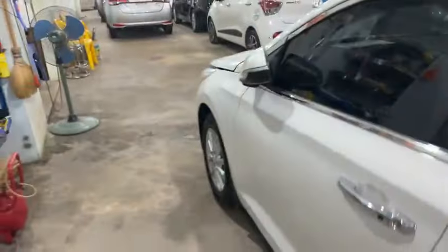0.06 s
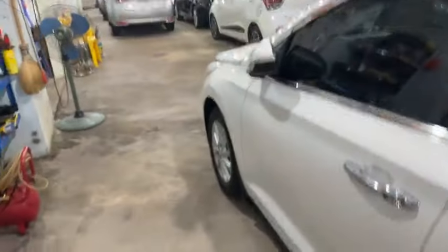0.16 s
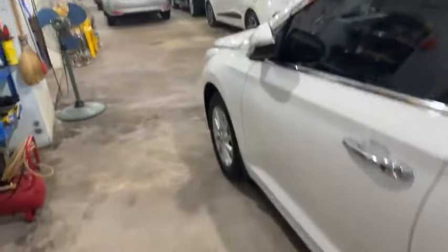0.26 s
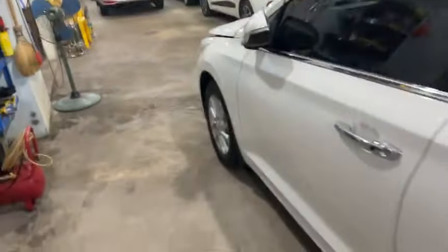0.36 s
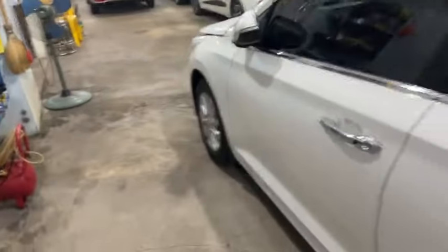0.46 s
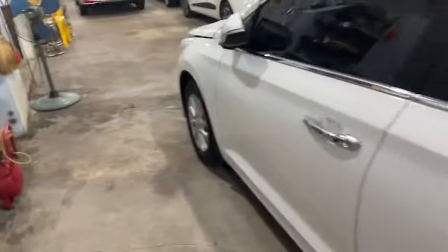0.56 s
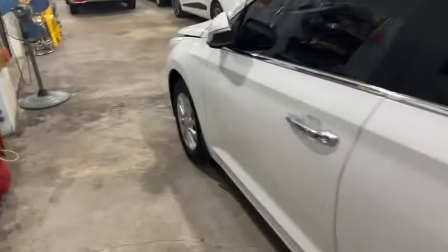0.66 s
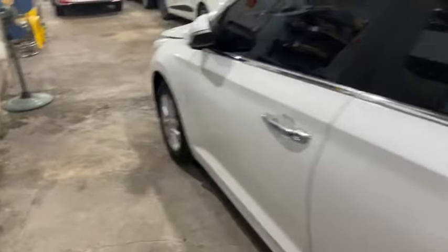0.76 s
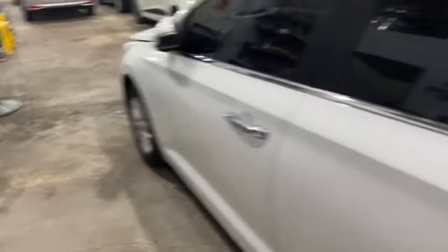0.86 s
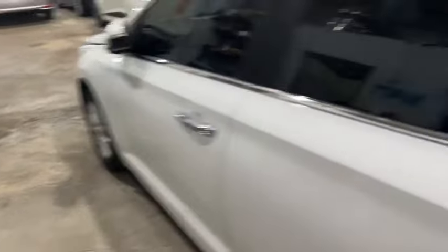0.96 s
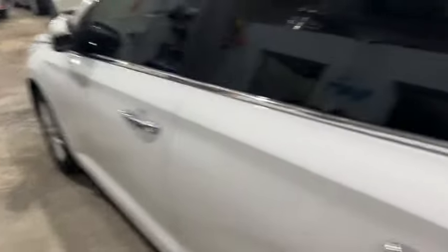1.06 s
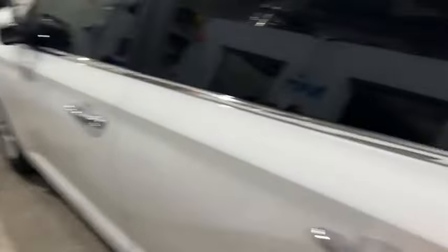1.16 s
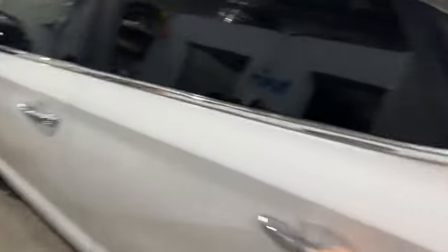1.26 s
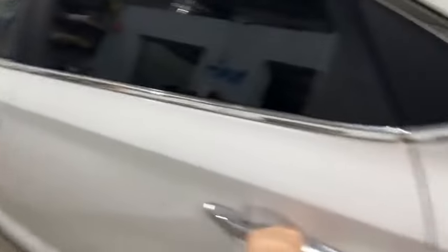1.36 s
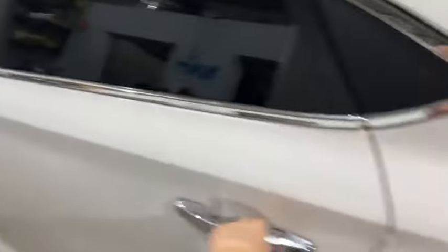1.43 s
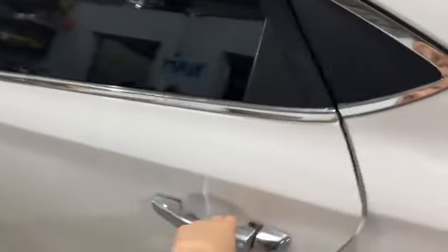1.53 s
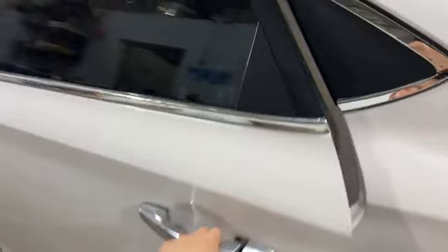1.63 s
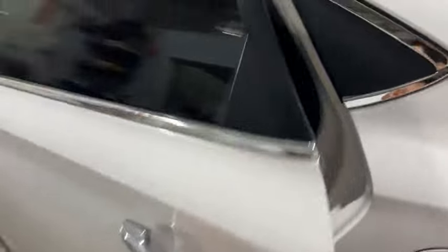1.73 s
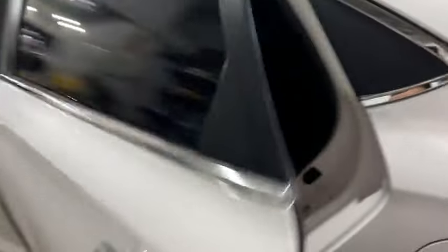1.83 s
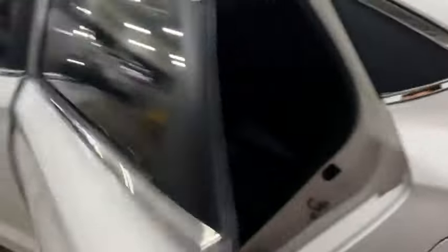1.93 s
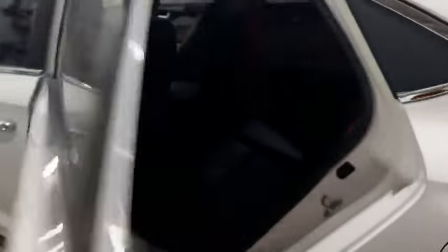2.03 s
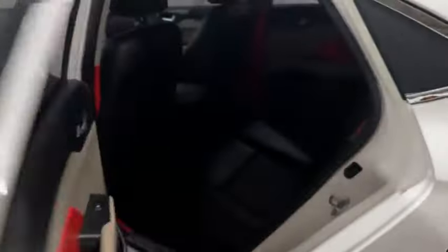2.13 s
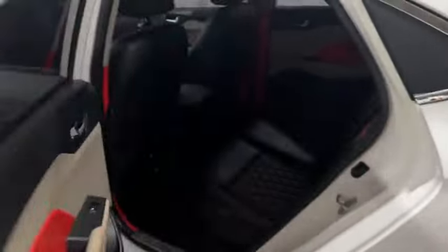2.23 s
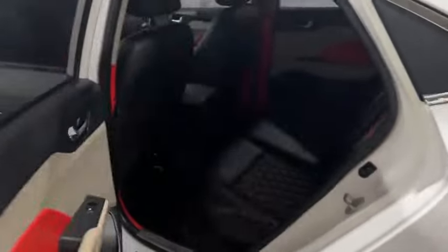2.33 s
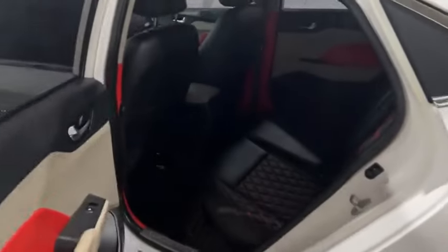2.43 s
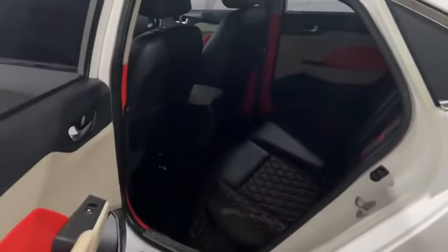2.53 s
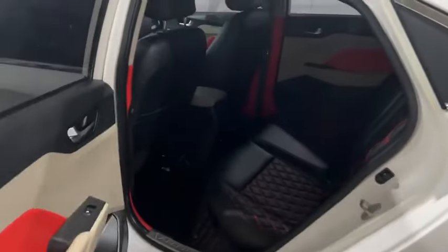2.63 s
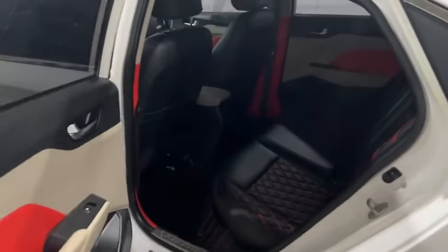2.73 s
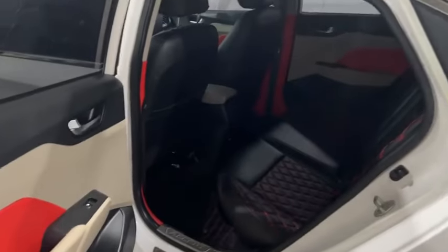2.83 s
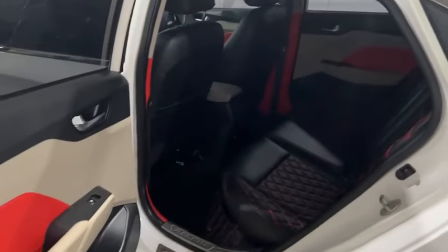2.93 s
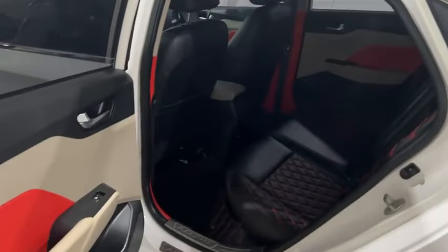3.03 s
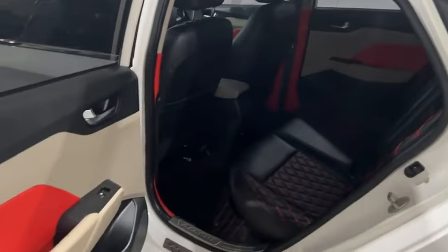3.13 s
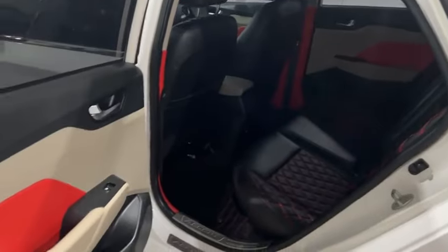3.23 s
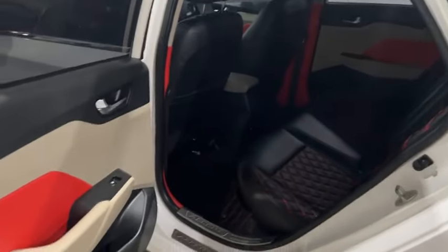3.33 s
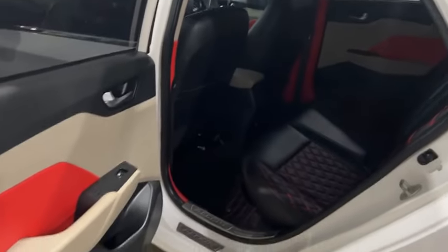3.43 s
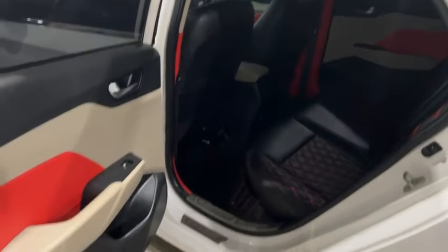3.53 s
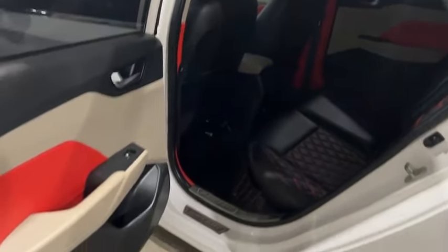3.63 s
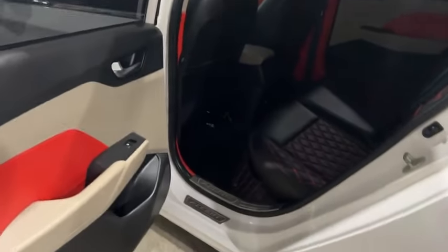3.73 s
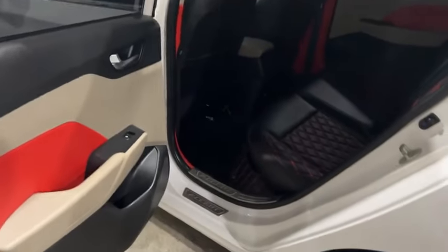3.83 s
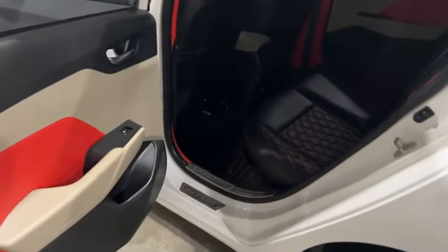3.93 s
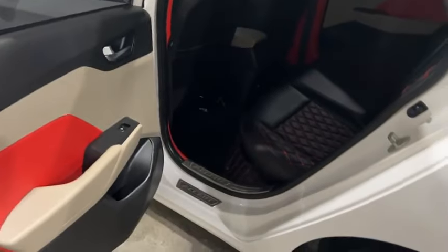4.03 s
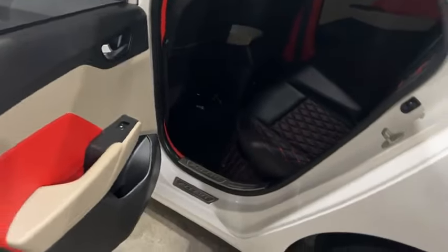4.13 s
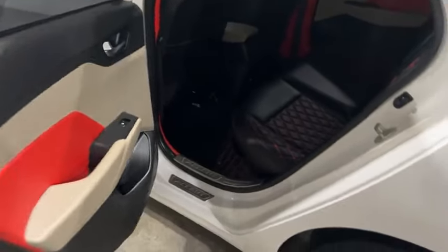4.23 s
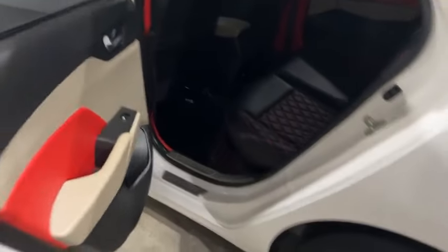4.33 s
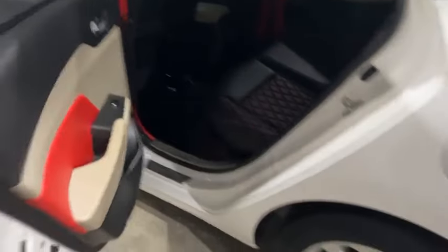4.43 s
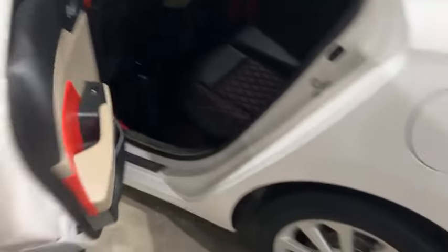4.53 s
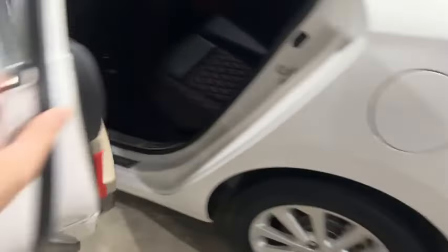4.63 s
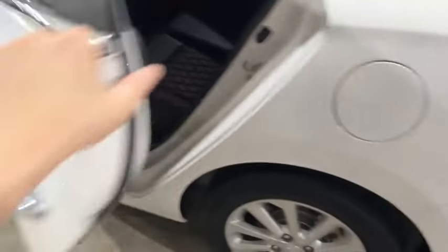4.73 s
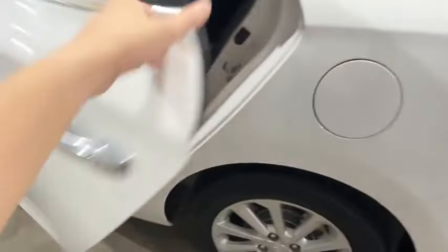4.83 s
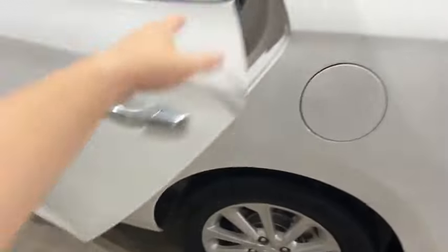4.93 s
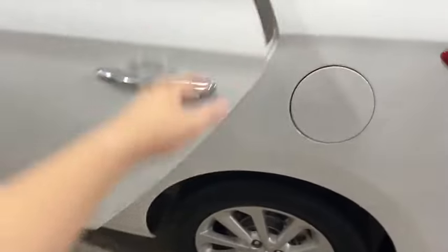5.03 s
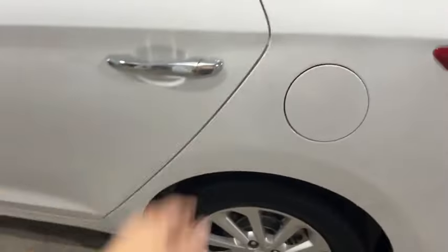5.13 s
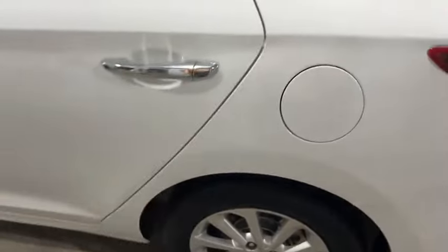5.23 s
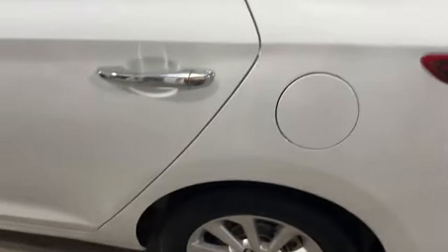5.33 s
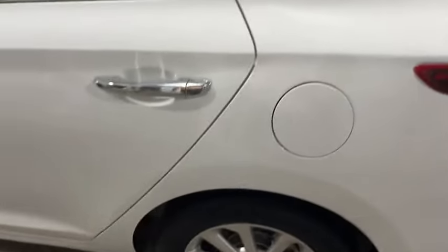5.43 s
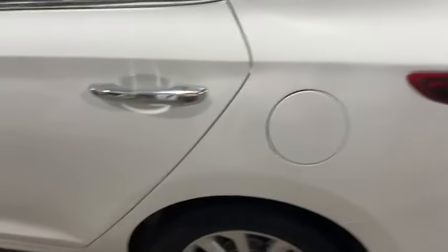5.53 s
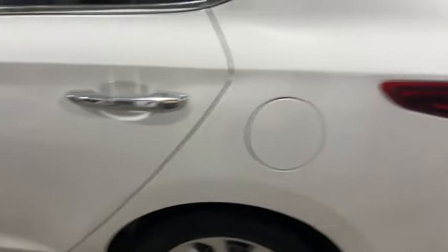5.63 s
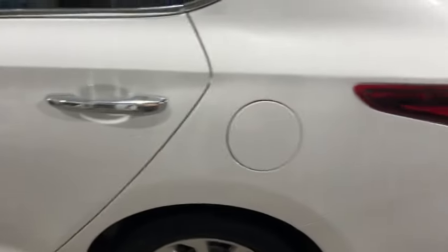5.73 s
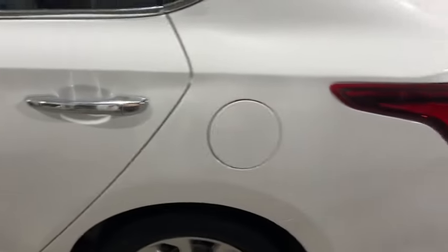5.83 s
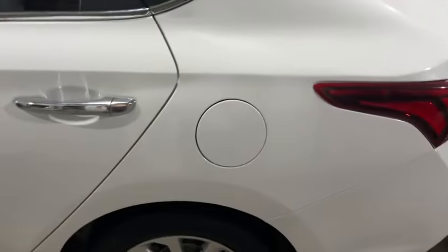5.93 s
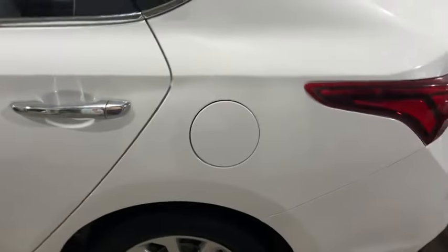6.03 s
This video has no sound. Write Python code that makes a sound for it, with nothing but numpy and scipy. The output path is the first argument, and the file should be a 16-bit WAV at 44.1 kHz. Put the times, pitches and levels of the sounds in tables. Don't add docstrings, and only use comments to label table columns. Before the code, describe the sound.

A single handheld microphone beside a car catches a booming door slam, shoe scuffs and a far low engine, small metal latch clacks, a dry handle knock and a short gritty rub. After dull cabin bumps and a short groan, a second, louder and tighter slam cracks off the hard walls, its echo dying quickly into steady high insect noise, faint fan hum and street rumble.

```python
import sys
import numpy as np
from scipy import signal
from scipy.fft import rfft, irfft
from scipy.io import wavfile
from scipy.ndimage import uniform_filter1d

SR = 44100
rng = np.random.default_rng(int(sys.argv[2]) if len(sys.argv) > 2 else 0)


def output_pcm(signal):
    pcm = np.clip(np.atleast_2d(signal).T, -1, 1) * 32767
    wavfile.write(sys.argv[1], SR, np.round(pcm).astype(np.int16))


def voltage_ratio(decibels):
    exponent = np.asarray(decibels, float) / 20
    return 10 ** exponent


N = 267687
T = np.arange(N) / SR

# (f/Hz, density/dB)
LATCH_CRACK = [(260, 3), (420, -7), (520, -17), (750, -5), (1050, -12), (1400, -14), (1750, -17),
               (2700, -28), (7000, -30), (15500, -52)]
# (f/Hz, density/dB)
HANDLE_CRACK = [(260, -18), (500, -26), (760, -12), (1170, -4), (2490, -21), (3500, -18), (4200, -23),
                (5100, -14), (6200, -15), (9520, -29), (15800, -62)]
# (f/Hz, spread/Hz, level/dB, throbs/Hz, throb depth/dB)
INSECTS = [
    (4905, 403, -1.95, 8.6, 1.5),
    (7405, 356, -1.5, 13, 1.9),
    (9270, 460, -23, 10.5, -1),
]


def evened(x):
    return x / np.sqrt(np.mean(x ** 2) + 1e-20)


def read(points, hz):
    f, value = np.transpose(points)
    return np.interp(np.log(hz + 1), np.log(f + 1), value)


def coloured(points, size):
    gain = voltage_ratio(read(points, np.fft.rfftfreq(size, 1 / SR)))
    return evened(irfft(rfft(rng.standard_normal(size)) * gain, size))


def resonate(x, hz, width):
    turn = np.exp(2j * np.pi * hz * T)
    r = np.exp(-np.pi * width / SR)
    return 2 * (turn * signal.lfilter([1 - r], [1, -r], x / turn)).real


def drift(top_hz):
    coarse = T[::64]
    waves = np.zeros(len(coarse))
    for f in np.geomspace(top_hz / 20, top_hz, 24):
        waves += np.sin(2 * np.pi * (f * coarse + rng.random())) / np.sqrt(f)
    return np.interp(T, coarse, evened(waves))


def swell(peak_s, level_db, rise_s, fall_s, t=T):
    away = np.where(t < peak_s, (peak_s - t) / rise_s, (t - peak_s) / fall_s)
    return voltage_ratio(level_db - np.minimum(20 * away ** 2, 100))


def walls(x):
    # (f/Hz, t60/s)
    wall_t60 = [(100, 0.66), (260, 0.44), (700, 0.38), (1840, 0.34), (4850, 0.5)]
    hz, t, z = signal.stft(rng.standard_normal(SR), SR, nperseg=512)
    t60 = np.clip(read(wall_t60, hz), .1, 2)[:, None]
    tail = signal.istft(z * voltage_ratio(-60 * t / t60), SR, nperseg=512)[1]
    tail = tail * np.clip(np.arange(len(tail)) / SR / 0.02, 0, 1) ** 2
    return signal.fftconvolve(x, tail / np.linalg.norm(tail))[:N]


def blow(strikes, modes, colour, crack_t60, treble_t60, wet_db):
    t, out = T[:SR // 2], np.zeros(N + SR)
    hz, level_db, t60 = np.transpose(modes)[:, :, None]
    for s, strength_db, contact_ms, crack_db in strikes:
        contact = contact_ms / 1000 + 2 / SR
        grip = rng.uniform(-1.55, 1, (2, len(modes), 1))
        turns = hz * (1 + .008 * grip[1]) * t
        decay = voltage_ratio(level_db + 2.6 * grip[0] - 60 * t / t60)
        ring = (decay * np.sin(2 * np.pi * turns)).sum(0)
        push = np.sin(np.pi * np.clip((t[:800] + 1 / SR) / contact, 0, 1)) ** 2
        ring = signal.oaconvolve(ring, push / push.sum())[:len(t)]
        shove = np.sin(2 * np.pi * np.clip(t / (1.89 * contact), 0, 1)) * np.exp(-t / contact)
        noise = coloured(colour, len(t))
        low = signal.sosfilt(signal.butter(2, 1800., fs=SR, output="sos"), noise)
        treble = (noise - low) * voltage_ratio(-60 * t / treble_t60) * 0.00065 / contact
        crack = low * voltage_ratio(-60 * t / crack_t60) + treble
        crack = voltage_ratio(crack_db) * crack * np.minimum(t / (1.09 * contact), 1)
        hit = ring / abs(ring).max() + 1.13 * shove + crack
        out[round(s * SR):][:len(t)] += voltage_ratio(strength_db) * hit
    return out[:N] + voltage_ratio(wet_db) * walls(out[:N])


def traffic():
    # (t/s, level/dB)
    passing = [
        (0.0, -54.5),
        (1.5, -56.5),
        (2.2, -57),
        (3.1, -62),
        (4.2, -63.5),
        (5.2, -62.5),
        (6.07, -61.5),
    ]
    # (peak t/s, level/dB, rise/s, fall/s)
    rolls = [
        (1.62, -53.5, 0.14, 0.23),
        (5.43, -50, 0.17, 0.2),
    ]
    # (f/Hz, density/dB)
    roar = [(15, -60), (35, -16.5), (55, -28), (105, -23), (126, -33.5), (253, -23.5), (445, -32),
            (1050, -35.5), (2000, -43.5), (3340, -49.5), (5500, -50.5), (8000, -61), (11000, -73),
            (15500, -86)]
    quiet_db, dull_per_db = -63, 0.29
    frames, hz = N // 256 + 5, np.fft.rfftfreq(1024, 1 / SR)
    a, b, patches = rng.standard_normal((frames, 513, 3)).T
    patches = evened(uniform_filter1d(uniform_filter1d(patches, size=8, axis=0), size=14, axis=1))
    t = np.arange(frames) * 256 / SR
    power = voltage_ratio(2 * np.interp(t, *np.transpose(passing))) + sum(swell(*row, t) ** 2 for row in rolls)
    level_db = 10 * np.log10(power)
    treble_db = 0.4 - dull_per_db * np.clip(level_db - quiet_db, 0, 9.)
    share = np.clip(np.log2(hz / 500 + 1e-9) / 3.5, -.6, 1)[:, None]
    field_db = read(roar, hz)[:, None] + 1.91 * patches + level_db + share * treble_db
    return voltage_ratio(23.0) * signal.istft((a + 1j * b) * voltage_ratio(field_db), nperseg=1024, noverlap=768)[1][:N]


def fan():
    # (f/Hz, width/Hz, level/dB)
    lines = [(86.1, 5.2, -65), (104.5, 18, -68), (171.2, 9.9, -66), (253.6, 5, -66)]
    noise = rng.standard_normal(N)
    out = np.zeros(N)
    for hz, width, level_db in lines:
        out += voltage_ratio(level_db) * evened(resonate(resonate(noise, hz, width), hz, width))
    return out


def insects():
    # (t/s, depth/dB, span/s)
    ducks = [
        (0.18, 5, 0.26),
        (3.1, -0.5, 0.42),
        (5.3, 0.5, 0.33),
    ]
    out, bins = np.zeros(N), np.fft.rfftfreq(N, 1 / SR)
    for hz, spread, level_db, throbs, depth_db in INSECTS:
        away = abs(bins - hz) / spread
        band = irfft(rfft(rng.standard_normal(N)) * np.exp(-.62 * away ** 2), N)
        throb = np.sin(2 * np.pi * (throbs * T + 0.3 * drift(2.1)))
        out += evened(band) * voltage_ratio(level_db + depth_db * throb + 1.1 * drift(2.1))
    dip_db = sum(depth_db * np.exp(-((T - s) / span) ** 2) for s, depth_db, span in ducks)
    return out * voltage_ratio(-63 - dip_db)


def engine():
    # (peak t/s, level/dB, rise/s, fall/s)
    surges = [
        (0.29, -47, .05, 0.065),
        (0.51, -52, .12, .09),
        (0.68, -46, .12, 0.75),
        (1.04, -45.5, 0.87, 0.12),
        (1.5, -53.5, 0.15, .4),
        (1.74, -52, .12, 0.38),
        (2.2, -64, 0.41, 0.22),
    ]
    coarse = T[::64]
    level = np.interp(T, coarse, np.max([swell(*row, coarse) for row in surges], axis=0))
    hz = 59.5 - 1.37 * level / level.max()
    return np.sqrt(2) * np.sin(2 * np.pi * np.cumsum(hz) / SR) * level


def scuffs():
    # (peak t/s, level/dB, rise/s, fall/s)
    brushes = [(0.2, -60.5, 0.17, 0.27), (0.94, -59, 0.079, 0.14), (1.02, -59.5, 0.17, 0.11),
               (1.36, -93, .08, .3), (1.63, -84, .08, .05), (2.137, -42, 0.014, 0.047),
               (2.21, -58, .1, 0.19), (2.35, -59, .2, .12), (3.0, -68, .1, .1), (4.4, -95, .06, .08)]
    # (f/Hz, density/dB)
    sole = [(800, -23), (1700, 7), (2400, -1), (6000, 0.5), (9000, -13), (12500, -8.5), (15000, -19)]
    coarse = T[::64]
    level = np.interp(T, coarse, sum(swell(*row, coarse) for row in brushes))
    return voltage_ratio(-5.5) * uniform_filter1d(level, size=900) * coloured(sole, N) * voltage_ratio(1.2 * drift(90.0))


def front_slam():
    # (t/s, strength/dB, contact/ms, crack against ring/dB)
    strikes = [
        (.033, -42, 2.1, 17.5),
        (.0495, -15.5, 0.91, -3),
        (.052, -12.5, 1.32, -11.5),
        (.060, -18, 2.1, -18),
        (.066, -14, 0.7, -14.5),
        (.083, -22.5, 1.14, -2),
        (.090, -15.5, 2.4, -16.5),
        (.116, -19.5, 1.9, -10),
        (.127, -20.5, 1.4, -21),
    ]
    # (f/Hz, level/dB, t60/s)
    modes = [(57.6, -1.5, 0.28), (99, 1, 0.13), (137, -8, 0.31), (189.5, -3, 0.13), (264, 3, 0.11),
             (327, 2, 0.1), (405, 3.5, 0.14), (520, -12, 0.14), (575, -8, 0.086), (756, -10, 0.1),
             (905, -24, .1), (1140, -21, .08), (1453, -26, .12)]
    # (f/Hz, density/dB)
    colour = [(260, -3.5), (450, -10), (767, -7), (1520, -25.5), (1710, -17), (2740, -19.5), (2950, -17),
              (4340, -22), (6190, -29.5), (15500, -67)]
    return blow(strikes, modes, colour, 0.12, 0.11, -7.5)


def latch():
    # (t/s, strength/dB, contact/ms, crack against ring/dB)
    strikes = [
        (1.588, -38, 1.6, -1),
        (1.608, -48, 1.5, -4),
        (1.661, -37.5, 1.5, 12),
        (1.665, -20, 0.71, -10),
        (1.674, -29.5, 0.75, 0.5),
        (1.693, -27, 0.72, -2.5),
        (1.715, -32.5, 1.2, -3),
    ]
    # (f/Hz, level/dB, t60/s)
    modes = [(85, -21, .2), (141.7, 2.5, 0.22), (260, -4.5, 0.104), (394, 1.5, 0.097), (670, -12, 0.089),
             (820, -20, .05), (1240, -29, 0.064), (1380, 4, 0.064)]
    return blow(strikes, modes, LATCH_CRACK, 0.068, 0.095, -12.5)


def handle():
    # (t/s, strength/dB, contact/ms, crack against ring/dB)
    strikes = [
        (2.1335, -33, 0.28, 5),
        (2.1355, -25.5, 0.2, -4.5),
        (2.140, -18, 1, -6),
        (2.158, -32.5, 3.6, 4),
        (2.185, -39.5, 0.87, 1.5),
    ]
    # (f/Hz, level/dB, t60/s)
    modes = [(88, -23, 0.16), (154, -9.5, 0.23), (264, -29, 0.043), (383, 9, 0.039), (320, -15, 0.072),
             (792, 0, 0.062), (1110, -2, 0.046), (560, -1, 0.042), (1190, -4, .04), (1450, -23, .04),
             (5690, -20, .1), (6220, -20, .1)]
    return blow(strikes, modes, HANDLE_CRACK, 0.033, 0.013, -10.0)


def check_arm():
    # (peak t/s, level/dB, rise/s, fall/s)
    stroke = (2.41, -58.5, .26, .07)
    rub = evened(resonate(resonate(rng.standard_normal(N), 1550.0, 330.), 1640.0, 330.))
    return rub * swell(*stroke) * voltage_ratio(1.9 * drift(50.))


def bumps():
    # (t/s, strength/dB, contact/ms, crack against ring/dB)
    strikes = [
        (2.458, -57, 4.5, -30),
        (2.609, -38.5, 5.7, -23),
        (2.807, -55, 3.1, -23),
        (4.059, -44, 3.8, -29),
        (4.628, -46.5, 4.5, -27),
        (5.619, -37, 3.1, -25),
    ]
    # (f/Hz, level/dB, t60/s)
    modes = [(71, 4, 0.096), (120, -3, 0.09), (259, -30, .08)]
    return blow(strikes, modes, LATCH_CRACK, 0.027, .03, -9.0)


def seal():
    # (t/s, strength/dB, contact/ms, crack against ring/dB)
    strikes = [
        (5.214, -42, 1.6, -18),
        (4.925, -56, .5, -3),
        (4.385, -66, .2, 3),
    ]
    # (f/Hz, level/dB, t60/s)
    modes = [(300, -9, .08), (450, -.5, .1), (820, -14, .06), (1550, -9, .06)]
    return blow(strikes, modes, HANDLE_CRACK, 0.038, .02, -6.)


def hinge():
    # (peak t/s, level/dB, rise/s, fall/s)
    slip = (4.915, -56, .085, .17)
    start_s, start_hz, glide_hz_per_s = 4.83, 222., 470.
    hz = start_hz + glide_hz_per_s * np.clip(T - start_s, 0, 0.21)
    turns = np.cumsum(hz * (1 + 0.008 * drift(44.0))) / SR
    overtones_db = [-7, -1, -14, -29, -32]
    tone = sum(voltage_ratio(db) * np.sin(2 * np.pi * k * turns) for k, db in enumerate(overtones_db, 1))
    tone *= swell(*slip) * voltage_ratio(1.5 * drift(35.))
    skin = resonate(resonate(tone, 300., 40.), 300., 40.)
    return 0.7 * tone + 9. * skin


def rear_slam():
    # (t/s, strength/dB, contact/ms, crack against ring/dB)
    strikes = [
        (5.276, -28, 1.6, -3),
        (5.2855, -14.5, 1.3, 0),
        (5.289, -16.5, 3.2, 6),
        (5.2938, -5, 2.2, -11),
        (5.31, -23, 0.86, 3),
        (5.317, -12.5, 1.44, -6),
        (5.323, -25, 2.2, 5),
        (5.33, -25.5, 1.55, 4),
        (5.344, -30, 1.3, -2),
        (5.367, -45, 4.6, -21),
    ]
    # (f/Hz, level/dB, t60/s)
    modes = [(62.6, -4, 0.31), (104, -5, 0.094), (141, -3, 0.15), (194, 0.5, 0.077), (282, 1.5, .06),
             (333, 0, 0.056), (393, -0.5, 0.1), (508, -30, .12), (596, 0, .07), (790, -19, .1),
             (830, -20, 0.083), (920, -11, 0.099), (1090, -5, .12), (1315, -26, .12), (2780, -28, .2)]
    # (f/Hz, density/dB)
    colour = [(260, -4), (420, -3.5), (600, -9.5), (930, -3), (1130, -18), (1350, -12.5), (1970, -25),
              (2810, -16.5), (3560, -24), (4200, -21.5), (6860, -29.5), (15800, -64.5)]
    return blow(strikes, modes, colour, 0.052, 0.11, -10.0)


def scene():
    beds = traffic() + fan() + insects() + engine() + scuffs()
    car = front_slam() + latch() + handle() + check_arm() + bumps() + seal() + hinge() + rear_slam()
    return (beds + car)[None]


def masked(x):
    # (from f/Hz, to f/Hz, threshold under the chorus/dB)
    valleys = [(5600, 6500, -15.5), (8050, 9000, -19.5)]
    hz, _, z = signal.stft(x, SR, nperseg=2048, noverlap=1536)
    power = uniform_filter1d(uniform_filter1d(abs(z) ** 2, size=3, axis=2), size=2, axis=1)
    chorus = np.median(power[:, abs(hz - INSECTS[1][0]) < 200])
    for lo_hz, hi_hz, under_db in valleys:
        inside = ((hz > lo_hz) & (hz < hi_hz))[:, None]
        z = z * ~(inside & (power < chorus * voltage_ratio(2 * under_db)))
    return signal.istft(z, SR, nperseg=2048, noverlap=1536)[1][:, :N]


def top_cut(x):
    return signal.sosfilt(signal.butter(12, 15760, fs=SR, output="sos"), x)


def record(dry):
    cut = signal.sosfilt(signal.butter(6, 50., "highpass", fs=SR, output="sos"), dry)
    mix = masked(cut)
    return top_cut(mix)


dry = scene()
out = record(dry)
output_pcm(out)
```